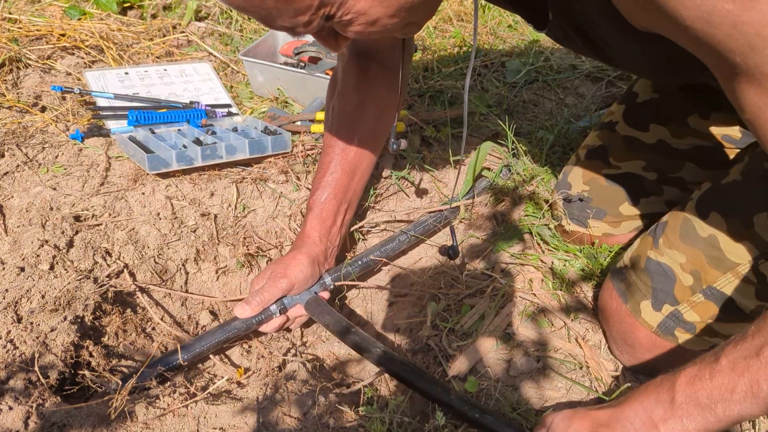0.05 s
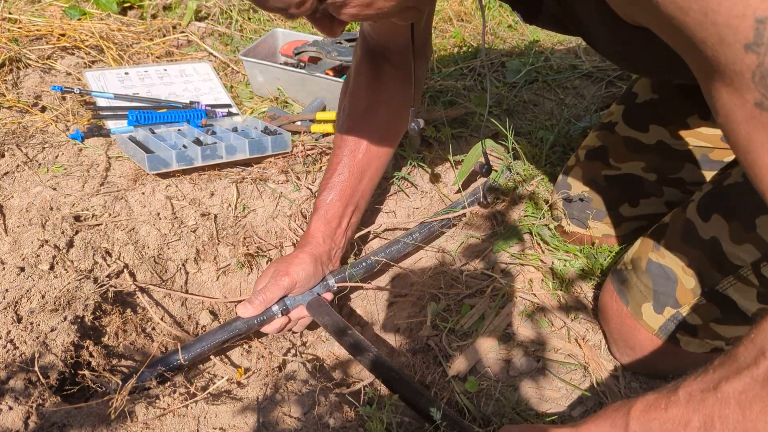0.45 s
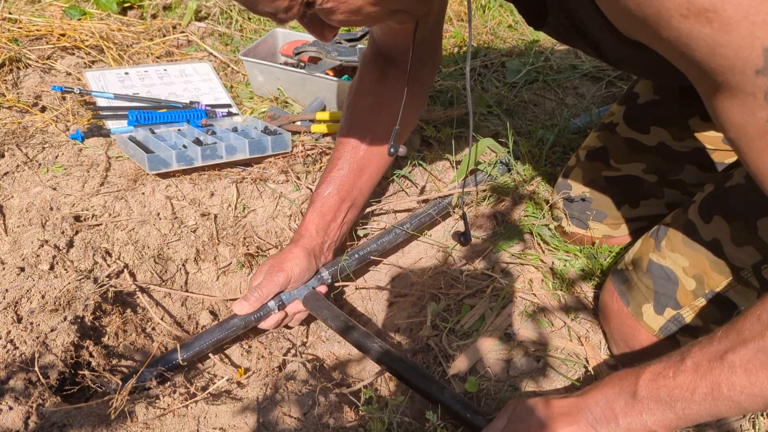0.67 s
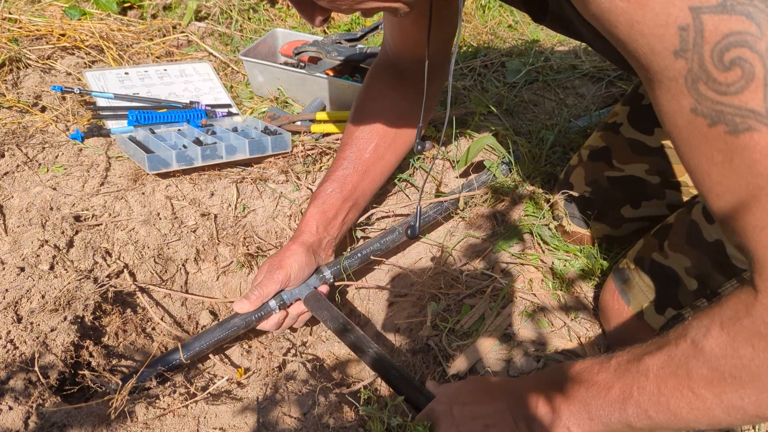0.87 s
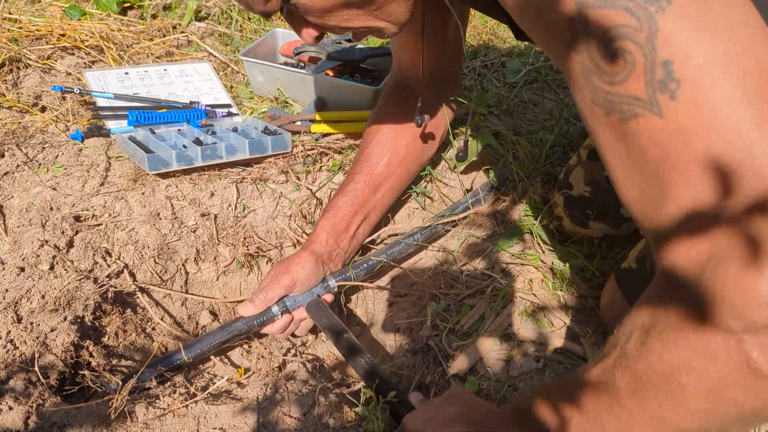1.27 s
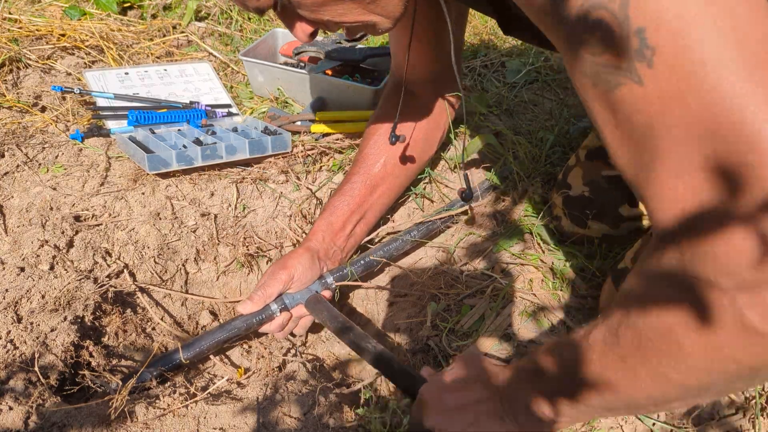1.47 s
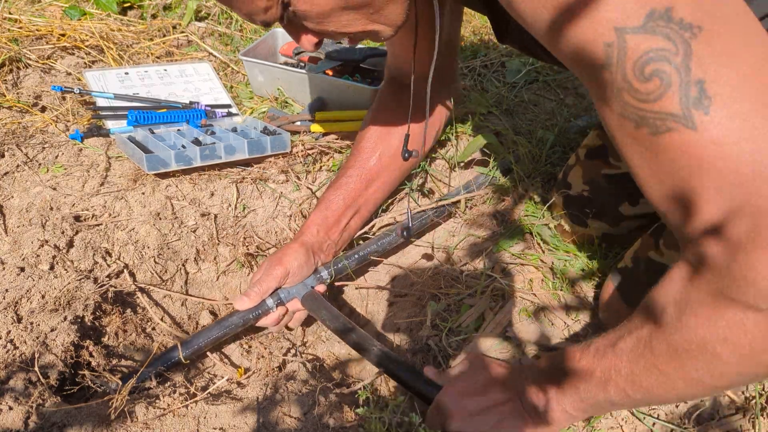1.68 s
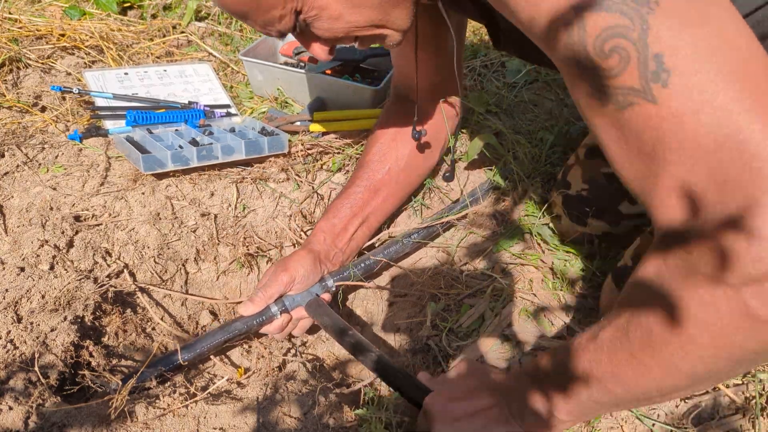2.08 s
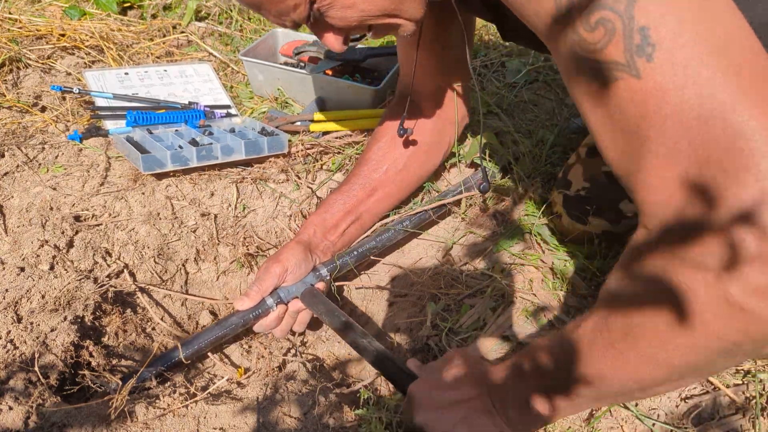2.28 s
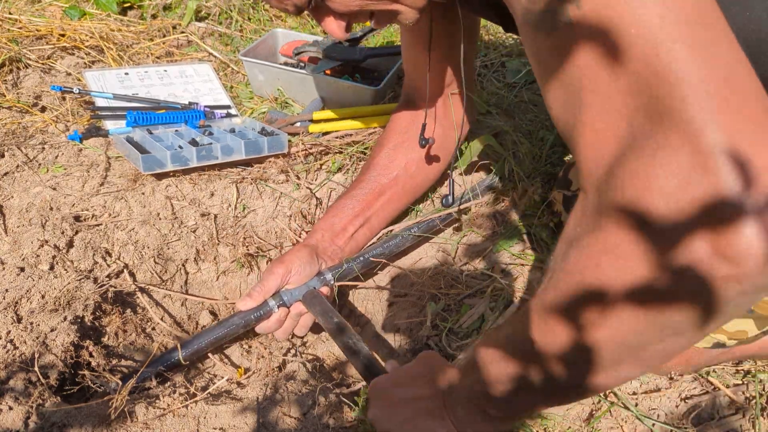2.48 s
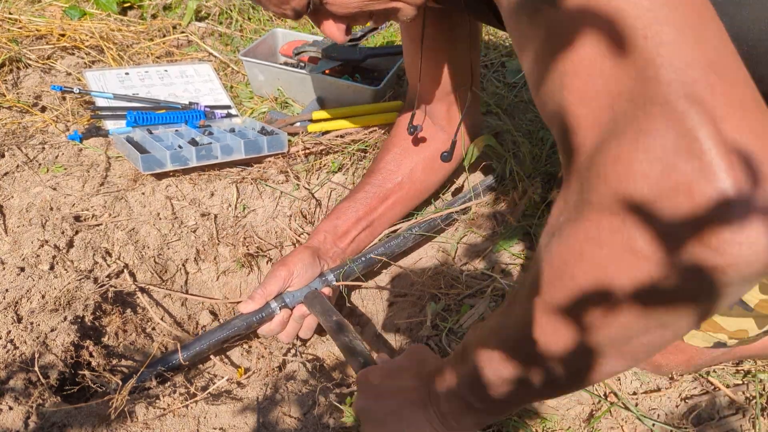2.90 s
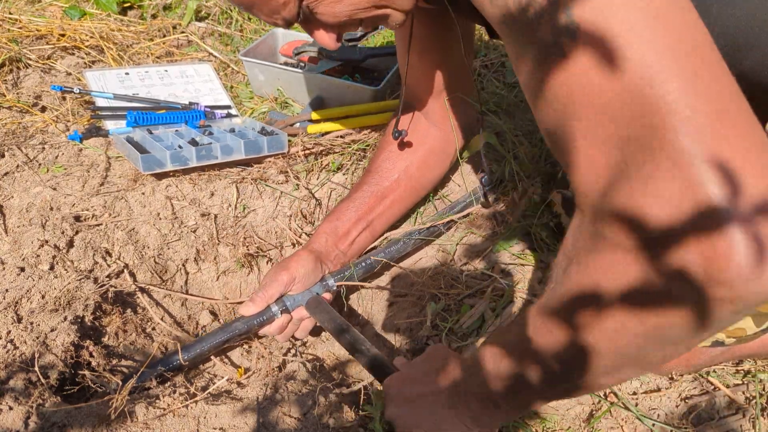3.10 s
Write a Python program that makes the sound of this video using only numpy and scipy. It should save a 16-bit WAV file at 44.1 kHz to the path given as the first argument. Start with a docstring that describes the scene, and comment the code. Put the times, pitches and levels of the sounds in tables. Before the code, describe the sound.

Sharp knocks of a steel tool on a plastic pipe sound near the microphone: one, a pause, then four evenly spaced, the later ones ringing. Small clicks and soft rustles of cloth and dry grass fill the gaps in light outdoor breeze.

```python
"""Knocking on a plastic pipe

A hand tool strikes a plastic pipe on dry ground five times, close by and a little to the left.
Each blow cracks, thuds and rings the pipe; the later ones leave the tool's steel singing.
Between blows, grit ticks, the pipe settles, and cloth and dry grass rustle as the arm moves,
all over a quiet outdoor rumble with puffs of breeze."""
import sys
import numpy as np
from scipy import signal
from scipy.fft import rfft, irfft, next_fast_len
from scipy.io import wavfile
from scipy.ndimage import map_coordinates

SR = 44100
rng = np.random.default_rng(int(sys.argv[2]) if len(sys.argv) > 2 else 0)


def master_out(mix):
    """Clip the mix to full scale and print it as 16-bit PCM to the path in sys.argv[1]."""
    frames = np.transpose(np.atleast_2d(mix))
    ceiling = np.clip(frames, -1, 1)
    pcm = np.round(ceiling * 32767).astype(np.int16)
    wavfile.write(sys.argv[1], SR, pcm)


N = 143325
SNAP_S = .0002  # from first contact to the snap
# each microphone's share of a left-right offset (rows: left, right)
SIDES = [
    [.5],
    [-.5],
]


def amp(db):
    """Decibels to gain."""
    return 10 ** (np.asarray(db) / 20)


def unit(x):
    """Scale to rms 1."""
    return x / np.sqrt(np.mean(x ** 2) + 1e-20)


def along(points, hz):
    """Read a curve of (f/Hz, value) points on a log frequency axis."""
    f, v = np.transpose(points)
    return np.interp(np.log(hz + 1), np.log(f + 1), v)


def filtered(x, response):
    """Shape x with a frequency response."""
    n = x.shape[-1]
    m = next_fast_len(n + 4096)
    return irfft(rfft(x, m) * response(np.fft.rfftfreq(m, 1 / SR)), m)[..., :n]


def bell(hz, centre_hz, octaves):
    """A gain that falls away on both sides of one frequency."""
    return 1 / (1 + (np.log2((hz + 1) / centre_hz) / octaves) ** 2)


def band(n, centre_hz, octaves):
    """Noise of rms 1 around one frequency."""
    return unit(filtered(rng.standard_normal(n), lambda hz: bell(hz, centre_hz, octaves)))


def wobble(rate):
    """A smooth random curve, rate knots a second."""
    return map_coordinates(rng.standard_normal(int(N * rate / SR) + 4), [np.arange(N) * rate / SR])


def fade(t, t60, attack):
    """Quick rise and exponential decay."""
    return np.exp(-np.log(1000) * t / t60) * (1 - np.exp(-t / attack))


def swell(peak, rise, fall):
    """A smooth hump around the time peak."""
    t = np.arange(N) / SR - peak
    return np.exp(-.5 * (t / np.where(t < 0, rise, fall)) ** 2)


def ring(t, modes, stretch, attack):
    """Damped modes with fresh phases on every strike; stretch scales their decay time."""
    return sum(amp(db) * np.sin(2 * np.pi * (hz * t + rng.random())) * fade(t, t60 * stretch, attack)
               for hz, db, t60 in modes)


def add(track, s, sound):
    """Mix a sound in at time s."""
    part = track[..., round(s * SR):][..., :sound.shape[-1]]
    part += sound[..., :part.shape[-1]]


def diffuse(spectrum, n):
    """Stereo noise from all sides: narrow in the low mids, wide in the deep bass and treble."""
    # likeness of left and right: f/Hz, coherence
    coherence = [(50, 0.26), (130, 0.88), (300, 0.9), (480, 0.94), (1000, 0.033), (3000, 0.14)]

    def mid_side(hz):
        angle = np.arccos(np.clip(along(coherence, hz), -1, 1)) / 2
        return amp(along(spectrum, hz)) * [np.cos(angle), np.sin(angle)]

    mid, side = filtered(rng.standard_normal((2, n)), mid_side)
    return unit(np.array([mid + side, mid - side]))


def from_left(x, lead_s=0.0003536):
    """The left microphone hears the work earlier and brighter."""
    # left over right: f/Hz, level/dB
    pan = [(300, -2), (650, 3.5), (1100, 2), (2200, 2), (3000, 5.5), (4200, 2.5), (9000, 7), (14000, 11)]
    sides = np.array(SIDES)
    return filtered(x, lambda hz: amp(sides * along(pan, hz)) * np.exp(2j * np.pi * hz * sides * lead_s))


def background():
    """An uneven rumble and gently drifting air, with puffs of breeze on the microphone ports."""
    # colours of the rumble and the air: f/Hz, level/dB
    rumble_colour = [(26, -58), (34, -25), (43, 0), (65, 1), (90, -5.5), (120, 0), (160, -15), (230, -46),
                     (400, -33), (900, -70)]
    air_colour = [(100, -25), (230, -1.5), (320, 0), (410, 8), (520, -7.5), (800, -4.5), (1500, -9),
                  (3500, -11), (6500, -14), (10000, -19.5), (15000, -22)]
    # breeze puffs: t/s, level/dB, length/s, f/Hz, left over right/dB
    puffs = [(0.07, -48, 0.065, 62.5, -1), (0.78, -40, 0.014, 71, 7.5), (1.05, -40, 0.014, 64.7, -7),
             (2.02, -39.5, 0.0068, 82, -22.5), (2.178, -45, 0.0054, 106, -27),
             (2.709, -42.5, 0.018, 65, -12)]
    t = np.arange(N) / SR
    breeze = sum(amp(db + np.array(SIDES) * pan_db) * swell(s, length, length)
                 * np.sin(2 * np.pi * hz * (t - s)) for s, db, length, hz, pan_db in puffs)
    rumble = amp(-51.5 + 0.87 * wobble(rate=8.91)) * diffuse(rumble_colour, N)
    air = amp(-56.5 + 1.5 * wobble(rate=4.7)) * diffuse(air_colour, N)
    return breeze + rumble + air


def rustle(grains_per_s=650, spread_db=5, flutter_db=2.3):
    """Cloth and grass slide in strokes: a fluttering hiss with the crackle of fibres that catch."""
    # arm strokes: peak t/s, rise/s, fall/s, level/dB, crackle over hiss/dB, hiss left over right/dB
    strokes = [(.08, 0.037, 0.038, -45.5, -1.5, 5.5), (0.294, 0.041, 0.048, -43, 0, 1.5),
               (0.593, 0.078, 0.034, -46.5, -3, 4.5), (.87, 0.095, 0.039, -49.5, -6.5, 1),
               (1.4, 0.23, 0.14, -58, -5, 3), (1.633, 0.019, 0.022, -43.5, -1, 5.5),
               (1.85, 0.081, 0.079, -51, -11, 4.5), (2.146, 0.016, 0.019, -43, 0, 6.5),
               (2.213, 0.022, 0.019, -45.5, -1, 5.5), (2.41, 0.087, 0.053, -50, -2.5, 4),
               (2.709, 0.04, 0.027, -42.5, -1, 6.5), (2.92, 0.12, 0.079, -54, -1.5, 3.5),
               (3.225, 0.036, 0.069, -47.5, -0.5, 5)]
    # colour of the fibres: f/Hz, level/dB
    colour = [(300, -7), (1600, -9), (2500, 3), (3400, -2.5), (5300, 2.5), (6000, -1.5), (7200, 4.5),
              (9800, -2.5), (12000, 1), (15000, -2.5)]
    sizes = rng.standard_normal(N) * amp(spread_db * np.clip(rng.standard_normal(N), -2, 2))
    catches = sizes * (rng.random(N) < grains_per_s / SR)
    grains = unit(filtered(catches, lambda hz: amp(along(colour, hz))))
    hiss, crackle = diffuse(colour, N), unit(from_left(grains))
    out = np.zeros((2, N))
    for s, rise, fall, db, crackle_db, pan_db in strokes:
        texture = amp(np.array(SIDES) * pan_db) * hiss + amp(crackle_db) * crackle
        out += amp(db) * swell(s, rise, fall) * texture
    return out * amp(flutter_db * wobble(rate=130))


def ticks():
    """Dry clicks of tool and grit: a snap and a grainy tail, each with its own brightness."""
    # small contacts: t/s, level/dB, t60/s, centre f/Hz, width/octaves
    clicks = [(.0298, -36.5, 0.031, 6400, 0.57), (0.07, -27, .01, 8130, 1.7),
              (0.086, -31.5, 0.015, 8000, 1.5), (0.1926, -41.5, 0.06, 2500, 0.73),
              (.2440, -22, 0.031, 1640, 2.6), (0.25, -19.5, 0.02, 1290, 2.5),
              (0.2725, -28.5, 0.019, 10000, 0.96), (0.2917, -36.5, 0.028, 4000, 1.4),
              (0.521, -36, 0.035, 4950, 0.48), (1.130, -44.5, 0.021, 10000, 1),
              (1.503, -27, 0.004, 8700, 1.5), (1.5142, -26.5, 0.007, 7150, 0.97),
              (1.579, -38, 0.075, 5700, 0.9), (1.6221, -29.5, 0.018, 5070, 2.7),
              (1.628, -41, 0.076, 2220, 0.23), (1.7956, -28.5, 0.012, 2500, 0.79),
              (1.802, -31.5, 0.033, 1300, 0.37), (2.110, -45, .02, 4900, 0.68),
              (2.373, -40.5, 0.069, 2820, 0.76), (2.6357, -34.5, 0.039, 6600, 2.6),
              (2.6935, -21.5, 0.0086, 10000, 0.89), (3.2046, -35, 0.023, 4700, 0.87)]
    out, t = np.zeros(N), np.arange(SR // 10) / SR
    impulse = signal.unit_impulse(len(t), round(SNAP_S * SR))
    for s, db, t60, centre_hz, octaves in clicks:
        snap = filtered(impulse, lambda hz: bell(hz, centre_hz, octaves))
        tail = band(len(t), centre_hz, octaves) * fade(t, t60, attack=0.00044)
        add(out, s, amp(db) * (tail + amp(-1) * snap / snap.max()))
    return from_left(out)


def contact_crack(t, snap_db=11, chatter_db=-9):
    """Tool meets plastic: a sharp snap in a burst of noise, trailed by softer chatter."""
    # colour of the crack: f/Hz, level/dB
    colour = [(200, -31), (700, 4), (1300, 1.5), (2000, -5), (2900, 0.5), (4200, 5.5), (6300, 0.5),
              (9500, -4), (15000, -8)]
    burst = fade(t, t60=0.011, attack=0.00011)
    chatter = amp(chatter_db) * fade(t, t60=0.061, attack=0.00016)
    contact = (burst + chatter) * rng.standard_normal(len(t))
    contact[round(SNAP_S * SR)] += amp(snap_db)
    return filtered(contact, lambda hz: amp(along(colour, hz)))


def steel_ring(t, t60, waver_rad=0.25):
    """The tool's steel sings in wavering modes, the highest dying first."""
    # tool modes: f/Hz, level/dB, share of t60
    modes = [(2299, 1, 1), (3803, -2, 0.6), (5550, -14, .4), (8300, -8, .25)]
    return sum(amp(db) * np.sin(2 * np.pi * hz * t + waver_rad * wobble(rate=170)[:len(t)])
               * fade(t, share * t60, attack=0.00034) for hz, db, share in modes)


def blows(thud_cycles=8.2, body_lag_s=0.00072):
    """Crack, clack and steel at contact, then the pipe's thud and ring and a scatter off the ground."""
    # five blows, with a soft rebound in row two; each layer's levels are relative:
    # t/s, crack/dB, thud/dB, thud f/Hz, pipe/dB, pipe decay stretch, clack/dB, steel/dB, steel t60/s
    hits = [(0.3238, -15.5, -11.5, 443, -21.5, 0.74, -30, -70, .08),
            (0.3545, -56, -31, 930, -32, 0.49, -44, -62, 0.055),
            (1.4075, -26, -16, 732, -26.5, 0.66, -31, -82, .08),
            (1.8973, -20, -18.5, 680, -23, 0.95, -28, -34.5, 0.16),
            (2.4280, -18, -23.5, 650, -22.5, 0.95, -32, -33.5, 0.17),
            (2.9445, -16, -24.5, 560, -23, 0.99, -28.5, -36, 0.27)]
    # modes of the hard plastic wall and of the pipe's body: f/Hz, level/dB, base t60/s
    wall_modes = [(3025, 0, .045), (3305, -1, .065), (3467, -1, .06), (3650, 1, .055), (4700, -5, .035),
                  (5350, -6, .04), (6370, -3, .04), (8590, -5, .04), (14560, -4, .04)]
    pipe_modes = [(113.4, -17, 0.27), (175.6, -12.5, 0.18), (344.2, 0.5, 0.094), (423.4, -5, 0.12),
                  (635.5, 2.5, 0.12), (802, -4, 0.096), (1064, -11.5, 0.13), (1230, -6.5, 0.064),
                  (1444, -8.5, 0.11), (1670, -3, 0.06)]
    # colour of the crack scattered off the ground: f/Hz, level/dB
    ground_colour = [(80, -23), (220, -3), (400, -0.5), (850, 2), (1500, 1), (2100, -9), (3600, -9),
                     (5000, -21), (15000, -31)]
    direct, around, t = np.zeros(N), np.zeros((2, N)), np.arange(SR // 2) / SR
    for s, crack_db, thud_db, thud_hz, pipe_db, stretch, clack_db, steel_db, steel_t60 in hits:
        crack = amp(crack_db + 6) * contact_crack(t)
        clack = amp(clack_db - 6.5) * ring(t, wall_modes, stretch=1, attack=0.00025)
        thud_envelope = fade(t, thud_cycles / thud_hz, attack=0.0013)
        thud = 2 * amp(thud_db) * np.sin(2 * np.pi * thud_hz * t) * thud_envelope
        pipe = amp(pipe_db - 3) * ring(t, pipe_modes, stretch, attack=0.00069)
        steel = amp(steel_db) * steel_ring(t, steel_t60)
        scatter = fade(t, t60=.11, attack=0.00077) * diffuse(ground_colour, len(t))
        add(direct, s, crack + clack + steel)
        add(direct, s + body_lag_s, thud + pipe)
        add(around, s, amp(crack_db - 13.5) * scatter)
    return from_left(direct) + around


def pipe_settling():
    """The pipe settles on the soil with dull bumps and scuffs."""
    # soil contacts: t/s, level/dB, length/s, f/Hz
    bumps = [(0.345, -34, 0.0055, 130), (0.355, -33.5, 0.012, 1130), (0.782, -55, 0.021, 466),
             (0.789, -52, 0.027, 1200), (0.801, -43, 0.0079, 125)]
    return from_left(sum(amp(db) * swell(s, length / 2, length) * band(N, hz, octaves=0.23)
                         for s, db, length, hz in bumps))


def scene():
    """All sources at the two microphones."""
    return blows() + ticks() + rustle() + pipe_settling() + background()


def record(dry):
    """The camera rounds off the highest peaks and keeps nothing above its band limit."""
    ceiling, top_hz = .92, 15900
    rounded = dry / (1 + np.abs(dry / ceiling) ** 6) ** (1 / 6)
    return filtered(rounded, lambda hz: hz < top_hz)


dry = scene()
out = record(dry)
master_out(out)
```